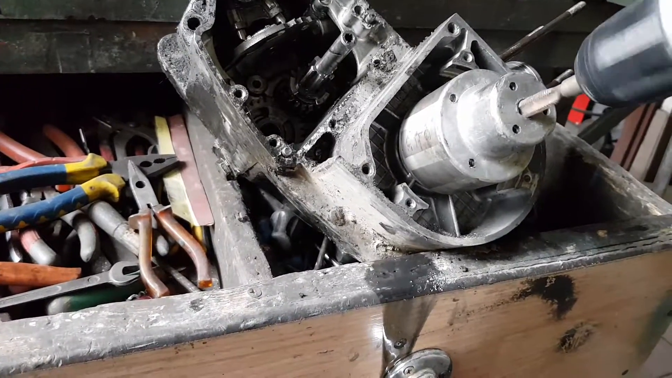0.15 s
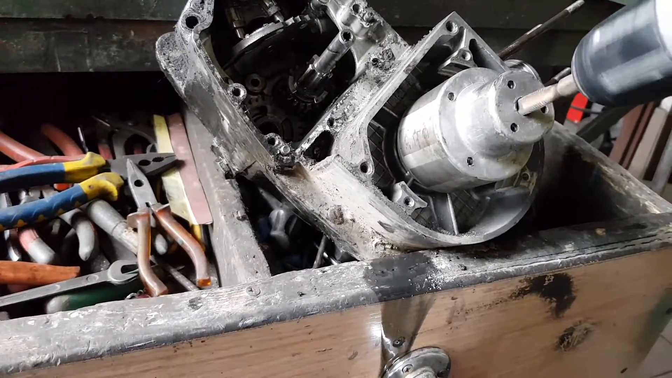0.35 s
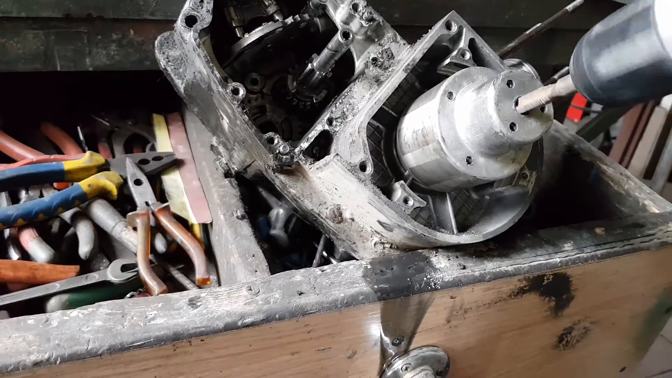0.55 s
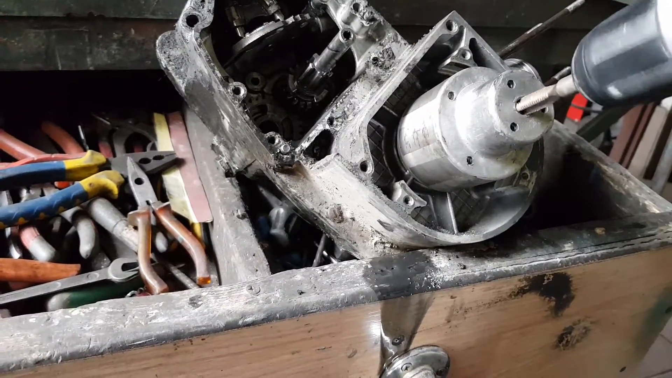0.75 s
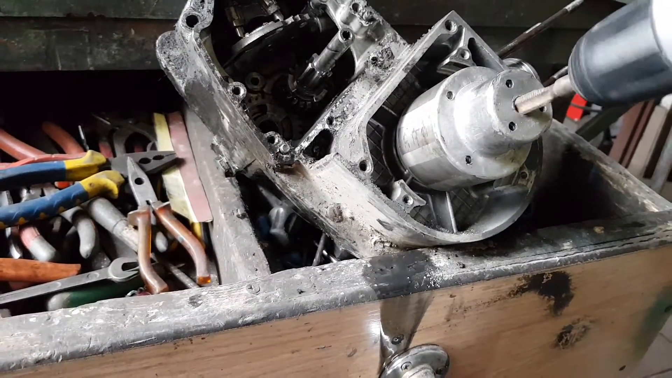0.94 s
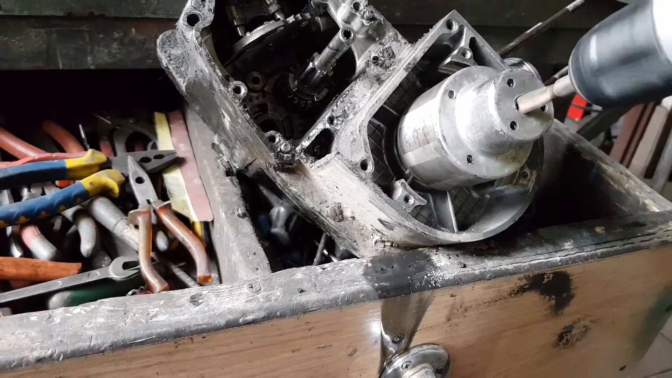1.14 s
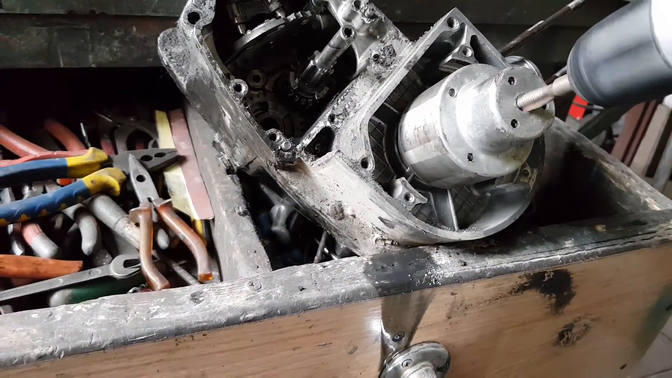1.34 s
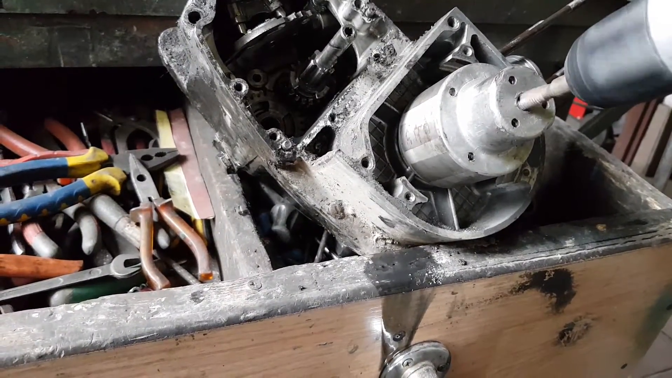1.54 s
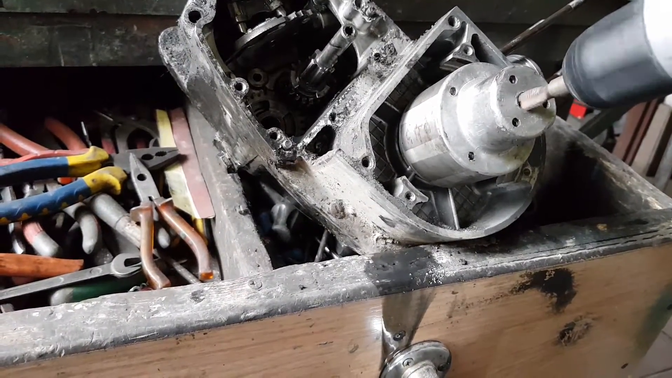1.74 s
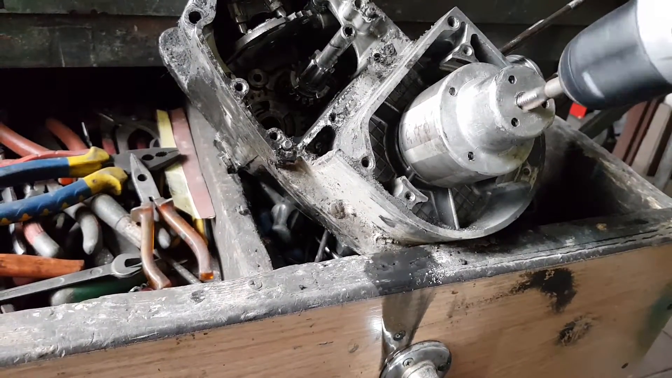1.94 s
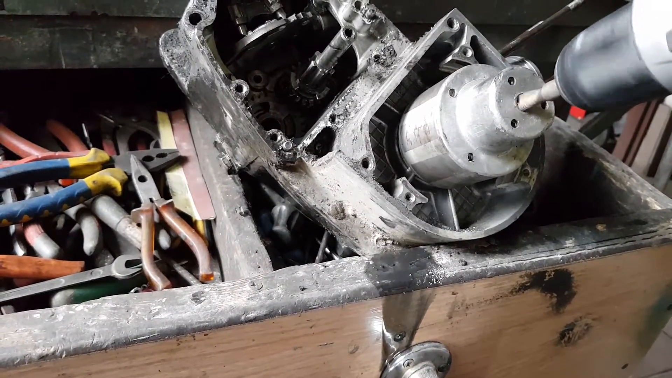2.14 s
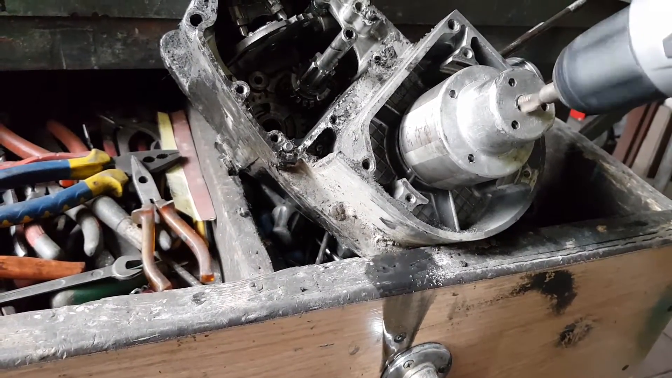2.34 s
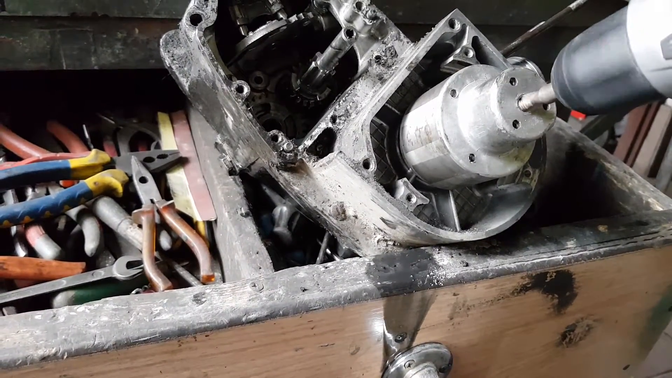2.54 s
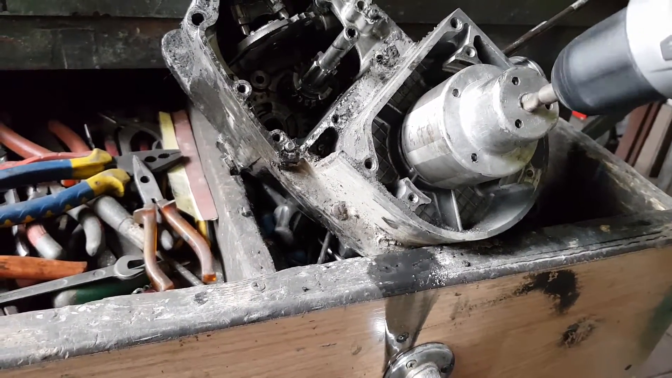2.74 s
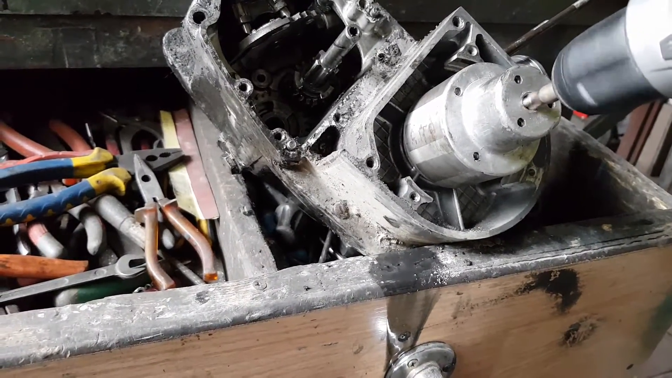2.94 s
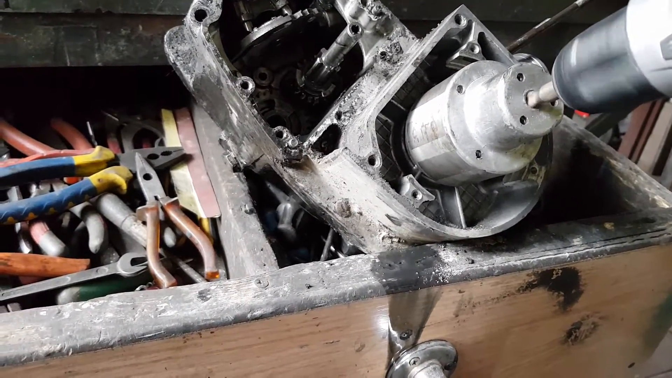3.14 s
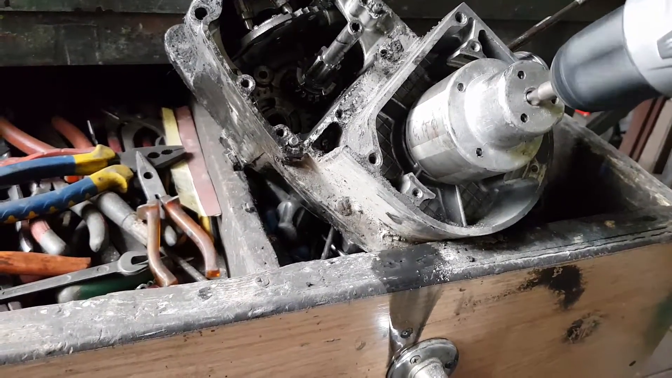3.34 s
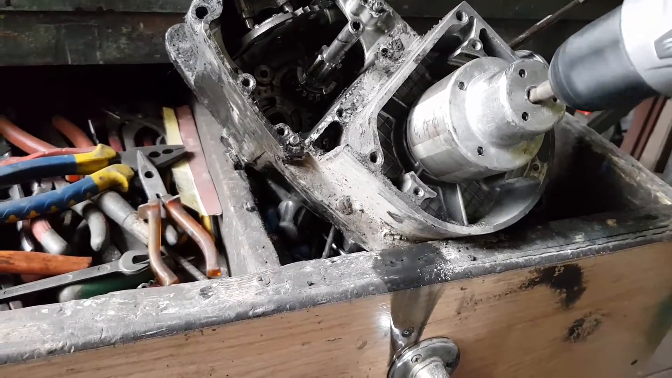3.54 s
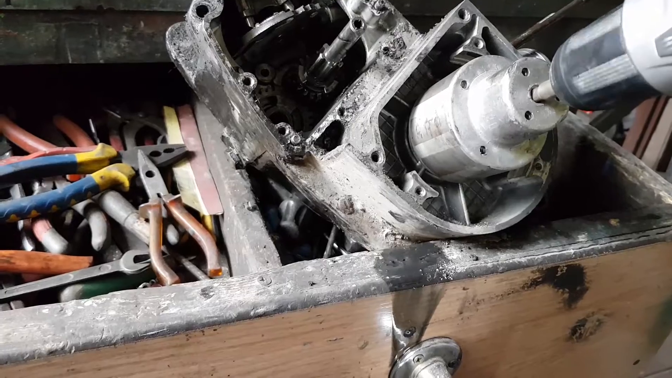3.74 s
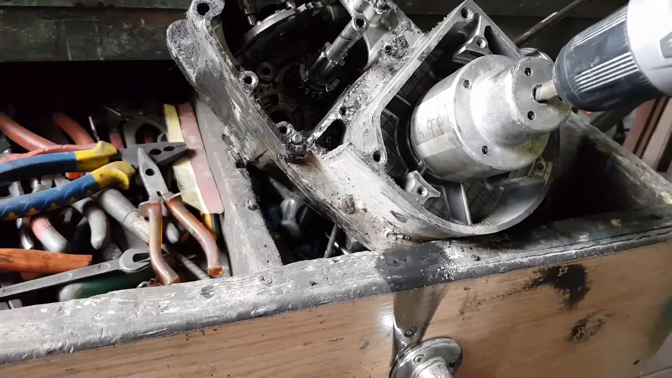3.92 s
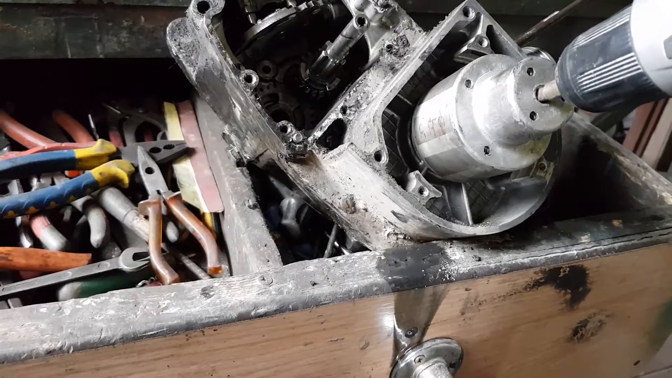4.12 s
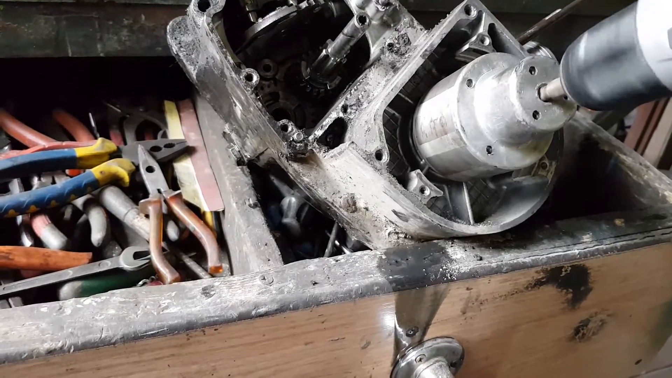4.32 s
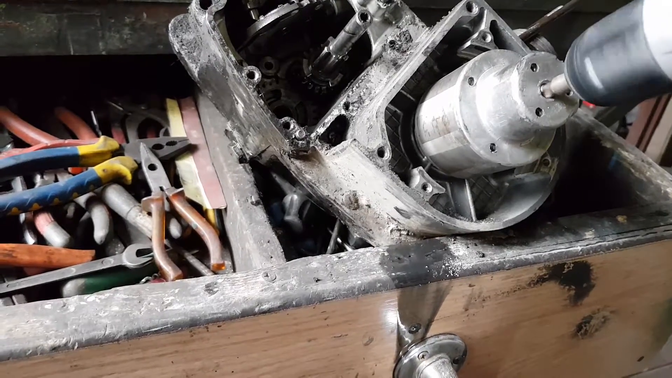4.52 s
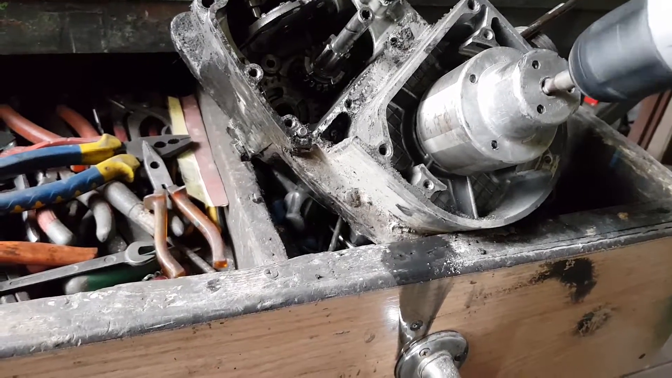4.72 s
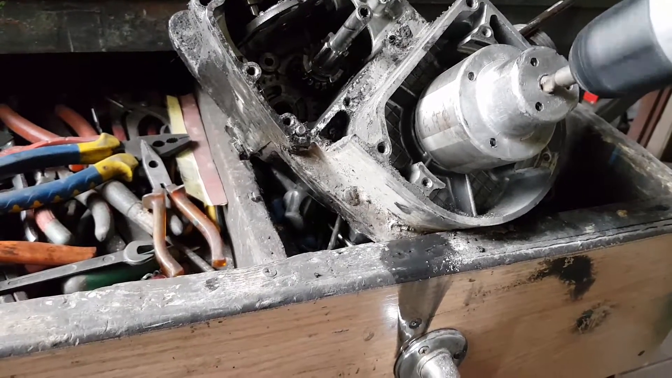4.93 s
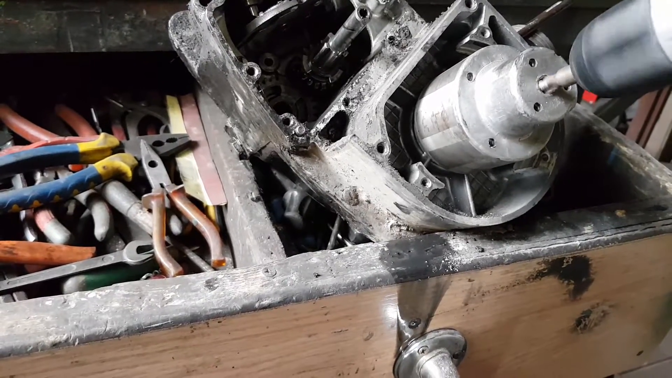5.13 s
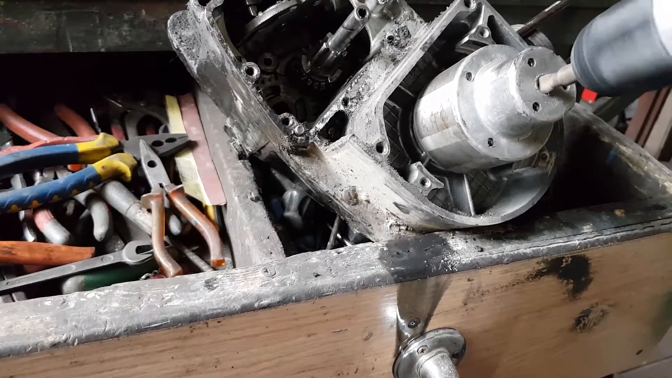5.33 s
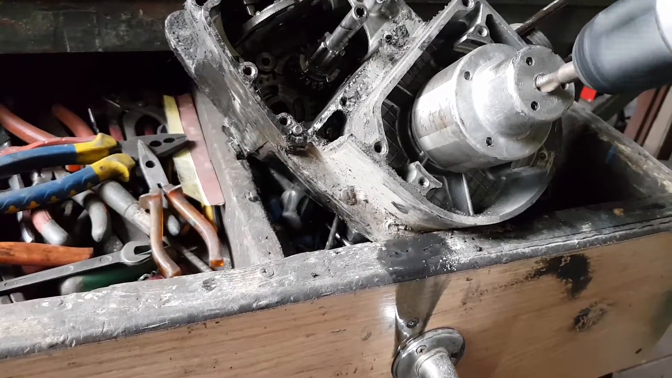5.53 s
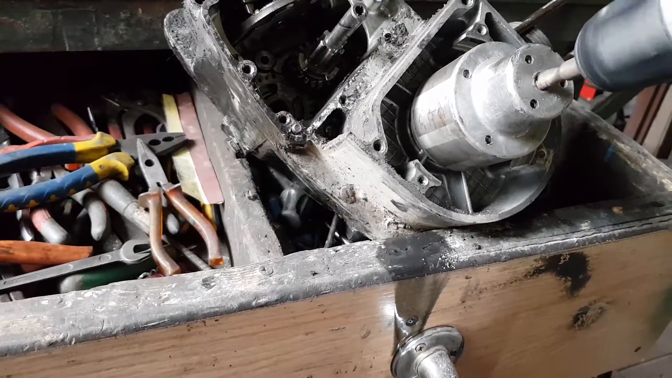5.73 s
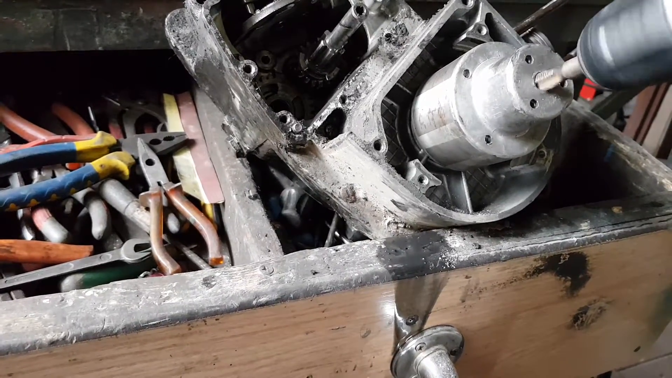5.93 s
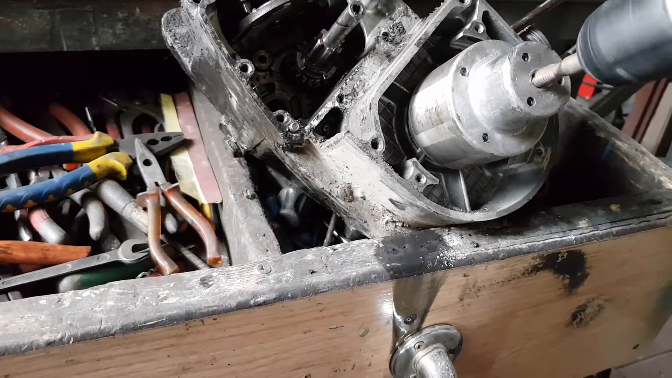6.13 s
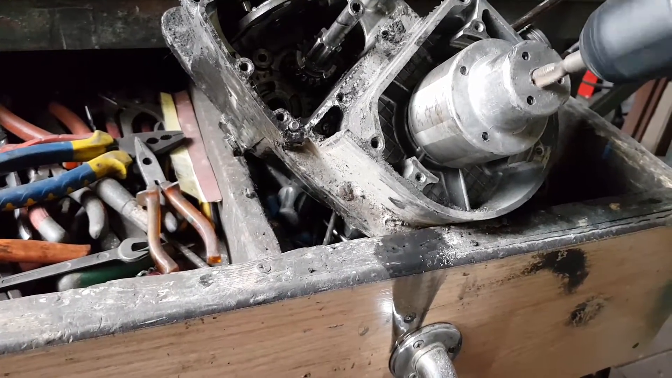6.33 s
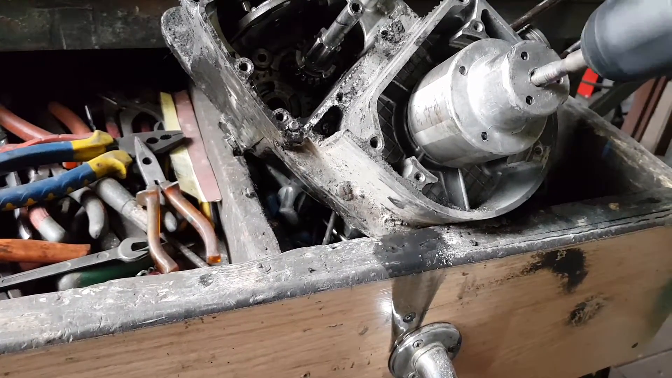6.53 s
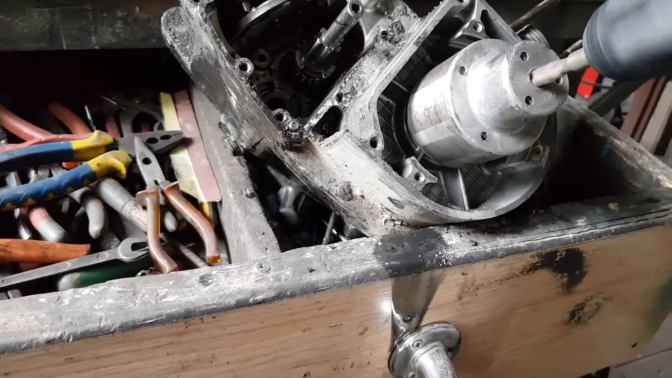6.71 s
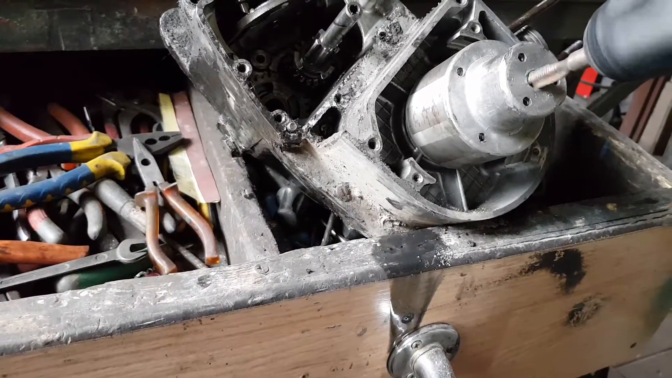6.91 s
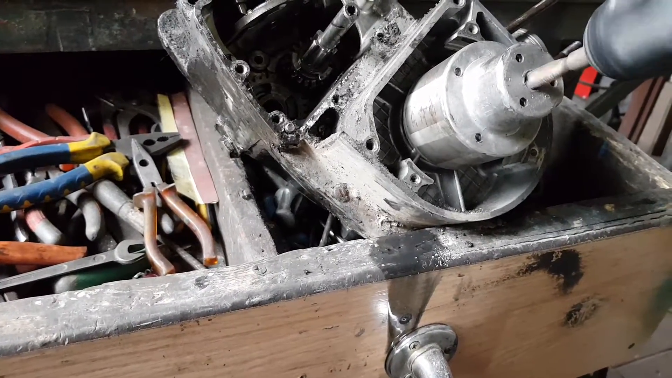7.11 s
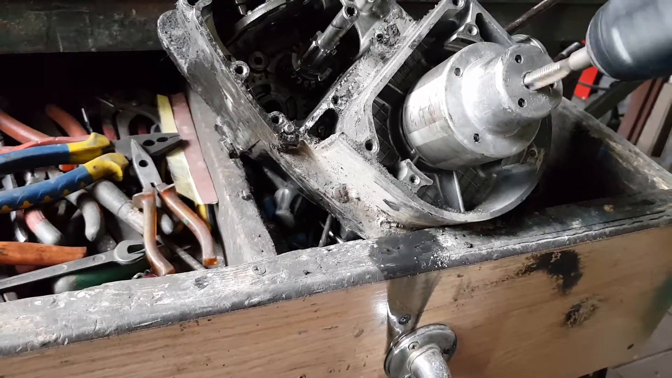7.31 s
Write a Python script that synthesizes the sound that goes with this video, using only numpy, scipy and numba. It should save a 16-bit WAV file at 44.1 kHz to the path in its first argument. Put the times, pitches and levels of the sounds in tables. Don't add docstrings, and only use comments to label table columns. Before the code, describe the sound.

A cordless drill crawls with a rough gear rattle, surges to a full whine, stops, clicks into reverse and whirs evenly onward.

```python
import sys
import numpy as np
from scipy import signal
from scipy.fft import rfft, irfft, next_fast_len
from scipy.io import wavfile
from scipy.ndimage import uniform_filter1d
from numba import njit

SR = 44100
rng = np.random.default_rng(int(sys.argv[2]) if len(sys.argv) > 2 else 0)


def gain_from_db(level_db):
    decades = np.asarray(level_db, float) / 20
    return 10 ** decades


def transcribe(u):
    v = np.clip(np.atleast_2d(u).T, -1, 1)
    q = np.round(v * 32767).astype(np.int16)
    wavfile.write(sys.argv[1], SR, q)


N = 329206
TIME = np.arange(N) / SR
SIZE = next_fast_len(N)
FREQ = np.maximum(np.arange(SIZE // 2 + 1) * SR / SIZE, 1)
FORWARD = TIME < 4
FAR_LAG_SAMPLES = 16.5


def level(x, db):
    return x * gain_from_db(db) / np.sqrt(np.mean(x ** 2))


def over_freq(points):
    hz, value = np.transpose(points)
    return np.interp(np.log(FREQ), np.log(hz), value)


def colour(x, gain):
    return irfft(rfft(x, SIZE) * gain, SIZE)[:N]


def band(lo_hz, hi_hz, order=2):
    low_skirt = 1 + (lo_hz / FREQ) ** (2 * order)
    high_skirt = 1 + (FREQ / hi_hz) ** (2 * order)
    return 1 / np.sqrt(low_skirt * high_skirt)


def bells(rings):
    return sum(db / (1 + (2 * (FREQ - hz) / width_hz) ** 2) for hz, width_hz, db in rings)


def walk(rate, size=N):
    step = 16
    k = int(SR / step / rate)
    held = np.repeat(rng.standard_normal(N // step // k + 2), k)
    slewed = uniform_filter1d(uniform_filter1d(held, k), k)
    return np.interp(np.arange(size) / step, np.arange(len(held)), 1.22 * slewed)


def bumps(rows, width_s):
    t = TIME[::32]
    return np.interp(TIME, t, sum(size * np.exp(-((t - s) / width_s) ** 2) for s, size in rows))


def settle(s, lag_s):
    return 1 - np.exp(-np.maximum(TIME - s, 0) / lag_s)


def order(turns, k, db, waver_db, rate):
    gain = gain_from_db(db + waver_db * walk(rate, size=len(turns)))
    return np.sqrt(2) * gain * np.sin(2 * np.pi * (k * turns + rng.random()))


@njit
def dull(x, hz):
    y, b, l = np.empty(len(x)), 0., 0.
    for i in range(len(x)):
        g = np.tan(np.pi * hz[i] / SR)
        v = (b + g * (x[i] - l)) / (1 + g * (g + 1.3))
        y[i] = l + g * v
        b, l = 2 * v - b, 2 * y[i] - l
    return y


def shop(source):
    # (frequency [Hz], density [dB per Hz])
    room_noise = [(18, -40.5), (30, 4), (95, 5), (124, -5.5), (259, -2), (295, -6), (449, -2.5), (866, -10),
                  (1250, 6), (2010, -8.5), (3310, -9), (7470, -19.5), (16000, -22)]
    noise_db, t60_s, wet_db = -64, 0.3, -13.5
    t = np.arange(SR // 2) / SR
    out = []
    for _ in range(2):
        decay = rng.standard_normal(len(t)) * 1000 ** (-t / t60_s) * (t > .004)
        tail = level(decay, wet_db) / np.sqrt(len(t))
        wet = colour(source, rfft(tail, SIZE) * band(60, 7300, order=1))
        hum = colour(rng.standard_normal(N) * gain_from_db(1.5 * walk(33)), gain_from_db(over_freq(room_noise)))
        out.append(wet + level(hum, noise_db + 2.5))
    return np.array(out)


def mains():
    # (time [s], rise [dB])
    swells = [
        (.5, 17),
        (5.3, 9),
        (7.3, 17),
    ]
    return gain_from_db(-67.5 + bumps(swells, .12)) * np.sin(2 * np.pi * 100.5 * TIME)


def draught(fan_hz):
    # (time [s], level [dB])
    air_levels = [
        (0, -33),
        (.5, -31),
        (.72, -37),
        (.92, -22),
        (1.13, -19.5),
        (1.18, -11.5),
        (2.35, -19.5),
        (2.7, -30.5),
        (3.75, -38),
    ]
    # (time [s], rise over the draught [dB])
    gust_rises = [(.16, 12), (.33, 7), (.47, 9), (.78, 4), (.95, 4), (1.07, 8), (2.02, 4.5), (2.2, 3.5),
                  (2.53, 3.5), (2.59, 4.5), (2.65, 1), (2.75, 3), (3.04, 7), (3.2, 6), (3.3, 9), (3.44, 9),
                  (3.66, 11.5)]
    # (time [s], level [dB], frequency [Hz])
    thumps = [(0.779, -20, 119), (.95, -14, 200), (2.132, -8, 332), (2.525, -11, 300), (2.647, -14, 139),
              (2.99, -15.5, 220), (3.68, -23, 150), (2.245, -4, 250), (2.836, -9.5, 250), (3.027, -11, 242),
              (3.05, -12, 167), (3.073, -8, 312), (3.198, -12.5, 146), (3.791, -21.5, 170),
              (4.289, -21, 280)]
    eddies_per_s, full_fan_hz = 450, 260
    edge_at_ref_hz, edge_floor_hz, edge_per_db = 375, 167, 0.74
    gust_db = np.interp(TIME, *np.transpose(air_levels), right=-90) + bumps(gust_rises, 0.022)
    edge_hz = np.maximum(edge_at_ref_hz * gain_from_db(edge_per_db * (gust_db + 12.5)), edge_floor_hz)
    edge_hz = np.minimum(edge_hz, 1.2 * fan_hz)
    fan_share = np.minimum(fan_hz / full_fan_hz, 1)
    wander = walk(90) * fan_share
    edge_hz = np.clip(edge_hz * 1.095 * gain_from_db(1.5 * wander), 40, 2000)
    hits = (rng.random(N) < eddies_per_s / SR) * rng.standard_normal(N)
    knocks = hits * np.sqrt(SR / eddies_per_s) * fan_share
    eddies = colour(knocks + 0.56 * rng.standard_normal(N), band(69, 4000, order=3))
    soft = dull(dull(dull(eddies, edge_hz), 1.75 * edge_hz), 2.66 * edge_hz)
    air = level(soft / np.sqrt(edge_hz), 0)
    air *= gain_from_db(gust_db + 0.88 * wander + .7 * walk(30))
    t = np.arange(-1000, 1000) / SR
    for at_s, db, hz in thumps:
        pulse = np.sin(2 * np.pi * hz * t) * np.exp(-(t * hz / 0.53) ** 2)
        air[int(at_s * SR) - 1000:][:len(t)] += gain_from_db(db) * pulse
    return air


def wobble(turns, slack, grip):
    fade_db = 75 * slack
    planet_db = -66.5 + 23 * grip - fade_db
    shaft_db = np.where(FORWARD, -57.5 + 9.5 * grip, -46.5 - 4.0 + 5 * (1 - grip)) - fade_db
    planet = order(turns, 2 / 3, planet_db, 2.5, rate=25)
    shaft = order(turns, 0.98, shaft_db, 1.1, rate=32) + order(turns, 2, shaft_db - 3.0, 2.8, rate=17)
    return np.array([planet + gain_from_db(np.where(FORWARD, -2.5, -11.)) * shaft, gain_from_db(-2.0) * planet + shaft])


def clicks():
    # (time [s], peak [dB], left minus right [dB])
    snaps = [
        (3.796, -27.5, 1.5),
        (3.8875, -41, -1),
        (3.9205, -49, -4),
        (4.0801, -44, -3),
        (4.156, -21, -10),
        (4.1583, -13, -18),
        (4.1600, -3, -3),
        (4.2334, -25, -5),
        (4.2766, -10, -12),
        (4.2846, -10, -13),
    ]
    # (frequency [Hz], level [dB], t60 [s])
    grip_modes = [(1170, -24, 0.021), (2324, 1.5, 0.012), (2870, 8, 0.0061), (4060, 20, 0.0091),
                  (4540, 6, 0.0089), (6000, -14, .006), (7500, 3, 0.011), (11000, -6.5, .004),
                  (13300, -7, .004)]
    mode_spread = .015
    out, t = np.zeros((2, N)), np.arange(1500) / SR
    for s, db, pan_db in snaps:
        for side, gain_db in enumerate((pan_db / 2, -pan_db / 2)):
            ring = np.zeros(len(t))
            for hz, mode_db, t60_s in grip_modes:
                mode_hz = hz * (1 + mode_spread * rng.standard_normal())
                ring += gain_from_db(mode_db) * np.sin(2 * np.pi * mode_hz * t) * 1000 ** (-t / t60_s)
            decay = 0.48 * np.exp(-t / 0.0002) + 0.044 * np.exp(-t / 0.0023)
            crack = np.diff(rng.standard_normal(len(t) + 1)) * decay
            at = int(s * SR + (1 - side) * FAR_LAG_SAMPLES)
            out[side, at:at + len(t)] += gain_from_db(db + gain_db + 2.5) * (ring / np.abs(ring).max() + crack)
    return signal.sosfilt(signal.butter(2, 550, "high", fs=SR, output="sos"), out)


def squeals():
    # (start [s], length [s], start frequency [Hz], end frequency [Hz], level [dB])
    bindings = [(.465, .025, 3480, 3500, -33), (.625, .035, 3480, 3480, -33), (.926, .04, 3450, 3570, -24),
                (2.469, .0085, 11050, 10950, -4), (2.4785, .0135, 10800, 11050, -2),
                (2.492, .042, 11000, 11000, -18), (2.641, .004, 10700, 10200, -6),
                (2.6456, .013, 10450, 11200, -2), (2.6595, .012, 10800, 10800, -14),
                (2.68, .018, 10700, 10800, -18), (5.494, .006, 10550, 10500, -9),
                (5.501, .012, 10550, 11250, -5), (5.516, .009, 10450, 10500, -13),
                (5.663, .014, 11900, 11860, -12), (5.835, .005, 9900, 9850, -4),
                (5.84, .006, 10500, 10500, -17), (5.841, .02, 9900, 9900, -23),
                (5.905, .006, 9000, 9900, -22)]
    gain_db, pan_db, lag_rad, ramp_s = 6, -3.5, 1.4, 0.0013
    out, rough = np.zeros((2, N)), gain_from_db(2.2 * walk(450))
    for start_s, length_s, from_hz, to_hz, db in bindings:
        t = np.arange(int(length_s * SR)) / SR
        ramps = np.minimum(1, np.minimum(t, length_s - t) / ramp_s)
        shape = (0.46 + 0.26 * t / length_s) * ramps
        phase = 2 * np.pi * (from_hz * t + (to_hz - from_hz) * t ** 2 / (2 * length_s))
        tone = np.array([gain_from_db(pan_db) * np.sin(phase - lag_rad), np.sin(phase)])
        at = int(start_s * SR)
        out[:, at:at + len(t)] += gain_from_db(db + gain_db) * shape * tone * rough[at:at + len(t)]
    return out


def chopper(turns):
    chop_hz, chop_db, off_s = 6460, -47, 1.15
    sides = 1 + 1.6 * np.cos(2 * np.pi * 6 * turns)
    tone = sum(np.sin(2 * np.pi * k * chop_hz * TIME) for k in (1, 2))
    return gain_from_db(chop_db + 2.5 * walk(17)) * sides * tone * (TIME < off_s)


def whine(turns, bars_db, mesh_db):
    forward_orders = [18, 20, 23, 24, 31, 32, 35, 36, 37, 39, 42, 44, 45, 46, 49]
    forward_db = [-17, -5, -12, -12.5, -14, -13.5, -9.5, -3.5, -10, -0.5, -14.5, -3.5, -16, -4.5, -17.5]
    reverse_orders = [21, 24, 28, 30, 32, 33, 34, 43, 45, 46, 48, 50, 51]
    reverse_db = [-8, -6, -11, -12, -14, -11, -4, -2, -1, -12, -13, -3, -12]
    out = order(turns, 12, bars_db, .6, rate=40)
    shaken = turns + np.cumsum(walk(45)) * .45 / SR
    stop = 4 * SR
    ways = ((forward_orders, forward_db, slice(0, stop)), (reverse_orders, reverse_db, slice(stop, N)))
    for orders, dbs, span in ways:
        for k, db in zip(orders, dbs):
            out[span] += order(shaken[span], k, mesh_db[span] + db - 4, 2.5, rate=35)
    return out


def loaded_gears(turns, slack, grip):
    pinion = order(turns, 10.08, -55 + 24 * grip - 60. * slack, 3.2, rate=26)
    mesh = order(turns, 35, -60 + 26 * grip - 100 * slack, 2, rate=30)
    return (TIME > 4) * pinion + mesh


def tones(turns, hz, share, bars_db, grip):
    slack = 1 - share
    coast_db = np.where(FORWARD, 110, 15.) * slack * (TIME > 2)
    blur_db = .004 * np.abs(np.gradient(hz) * SR) * (TIME < 2)
    bars_db = bars_db - coast_db - 60 * (share < .2) - blur_db
    mesh_db = np.where(FORWARD, bars_db + 1 - 6 * grip, -28) - 65. * slack
    return whine(turns, bars_db, mesh_db) + chopper(turns) + loaded_gears(turns, slack, grip)


def speed(full_hz):
    # (time [s], spin-up lag [s])
    squeezes = [
        (.835, .1),
        (1.14, .038),
    ]
    crawl_share, creep_per_s, pull_share = .27, .075, .235
    release_s, coast_hz_per_s2 = 3.6, 2600
    restart_s, restart_lag_s = 4.247, .028
    (first_s, first_lag_s), (second_s, second_lag_s) = squeezes
    share = crawl_share + creep_per_s * np.minimum(TIME, second_s)
    share = share + pull_share * settle(first_s, first_lag_s)
    share = share + (1 - share) * settle(second_s, second_lag_s)
    share = share - coast_hz_per_s2 * np.maximum(TIME - release_s, 0) ** 2 / full_hz
    return np.maximum(np.where(FORWARD, share, settle(restart_s, restart_lag_s)), .02)


def rattle_levels(run_db, share, grip):
    # (time [s], rise [dB])
    surges = [
        (.15, 0.5),
        (.3, 2.5),
        (.45, 0),
        (.945, 2.5),
        (1.05, 2.5),
        (1.155, 3.5),
        (1.25, 2.5),
        (.62, 0.5),
        (1.64, -1),
    ]
    brake_s, brake_db_per_s = 3.735, 429
    lever_s, shake_db, shake_db_per_s = 4.162, -24.5, 650
    creep_s, creep_db, creep_lag_s = 4.215, -37.5, 0.0062
    engage_s, engage_lag_s = 4.247, 0.018
    crawl_low_db, full_low_db = -12, -9
    forward = gain_from_db(run_db + bumps(surges, 0.026) - brake_db_per_s * np.maximum(TIME - brake_s, 0))
    shake = gain_from_db(shake_db - shake_db_per_s * np.abs(TIME - lever_s)) * (TIME > lever_s)
    creep = gain_from_db(creep_db) * settle(creep_s, creep_lag_s)
    reverse = shake + creep + gain_from_db(run_db) * settle(engage_s, engage_lag_s)
    gear_db = 20 * np.log10(np.where(FORWARD, forward, reverse) + 1e-6)
    hush_db = np.clip(run_db - gear_db, 0, 32)
    low_db = crawl_low_db + (full_low_db - crawl_low_db) * share ** 1.8 - grip + 0.48 * hush_db
    top_db = np.where(FORWARD, -2, -0.5) - 0.35 * hush_db
    return gear_db, low_db, top_db


def gears(turns, hz, gear_db, low_db, top_db):
    # (frequency [Hz], density [dB per Hz])
    housing = [(50, -34), (150, -16.5), (400, -14.5), (900, -12.5), (1500, -8.5), (2200, -6), (3200, -0.5),
               (5000, -3.5), (7500, -2.5), (9500, -8), (12000, -1.5), (14000, -9), (15800, -5.5)]
    # (frequency [Hz], width [Hz], level over housing [dB])
    full_rings = [(983, 450, 6), (1595, 204, 6), (2980, 220, 1.5), (4255, 550, 4.5), (5600, 234, 6.5),
                  (6280, 1170, 3.5), (7150, 170, 0.5), (8660, 200, 4.5), (10000, 420, -3.5),
                  (10900, 780, 2), (13000, 800, 5.5), (13830, 500, 0)]
    # (frequency [Hz], width [Hz], level [dB])
    slow_rings = [(605, 660, -2), (2000, 590, -6), (2450, 110, 5.5), (3070, 400, 2), (4030, 170, 6)]
    throb = gain_from_db(0.74 * np.cos(2 * np.pi * turns) + .65 * walk(12) + 0.77 * walk(90))
    body, crawl = gain_from_db(over_freq(housing) + bells(full_rings)), gain_from_db(bells(slow_rings))
    body /= np.sqrt(np.mean(body ** 2))
    parts = [(band(20, 2273, order=8), low_db + 12.0),
             (band(2750, 10050, order=8), 0),
             (band(10540, 17000, order=8), top_db + 4.0)]
    slow = np.clip((150 - hz) / 40, 0, 1) * FORWARD
    out = []
    for _ in range(2):
        impacts = rng.standard_normal(N) * throb * gain_from_db(1.77 * rng.exponential(size=N))
        teeth = rfft(level(impacts, 1.83), SIZE)
        rattle = np.zeros(N)
        for part, db in parts:
            rattle += irfft(teeth * body * part, SIZE)[:N] * gain_from_db(gear_db + db + 0.34 * walk(7.9))
        out.append((1 - slow) * rattle + colour(slow * rattle, crawl))
    return out


def far_port(x, stranger):
    # (frequency [Hz], level re near port [dB])
    shadow_points = [(60, -9), (200, -4.5), (400, -5), (700, -8.5), (1300, -5), (2200, -7.5), (3500, -7),
                     (5600, -8.5), (8000, -11.5), (9000, -9.5), (11500, -14), (13000, -23), (16000, -31)]
    # (frequency [Hz], share [0-1])
    likeness = [(60, 0.74), (400, 0.44), (1200, 0.7), (2200, 0.28), (5000, 0.11), (11500, 0.32),
                (16000, 0.37)]
    bench_lag_samples = 55
    direct = np.exp(-2j * np.pi * FREQ * FAR_LAG_SAMPLES / SR)
    paths = direct + 0.2 * np.exp(-2j * np.pi * FREQ * bench_lag_samples / SR)
    share = np.clip(over_freq(likeness), 0, 1)
    shadow = gain_from_db(over_freq(shadow_points))
    return colour(x, shadow * share * paths * 1.2) + colour(stranger, shadow * np.sqrt(1 - share ** 2))


def scene():
    # (time [s], shaft at full trigger [Hz], rattle [dB], commutator [dB], tap grip [0-1])
    motor = np.array([(0, 320.2, -24, -63, 0), (.8, 319.9, -22.5, -46, 0), (.87, 320, -20, -36, 0.8),
                      (1.14, 320, -16.5, -30, 0.4), (1.3, 321.1, -16.5, -25, 0),
                      (1.85, 320, -19, -29, 0.02), (2.43, 311.7, -19, -32, 1), (2.75, 312, -23, -37, 0.37),
                      (3.7, 309.3, -23, -40, 1), (4.3, 296.7, -17.5, -27, 0.82),
                      (5.0, 296.1, -17, -29.5, 0.88), (5.35, 300.1, -16.5, -26, 0.76),
                      (5.65, 298, -19, -27, 0.78), (5.86, 303.3, -22.5, -28, 0.55),
                      (5.94, 304.1, -22, -26, 0.4), (6.8, 303.7, -21.5, -25.5, 0.37),
                      (7.0, 304, -20, -24, 0), (7.46, 305.8, -18.5, -21.5, 0)])
    # (time [s], drop [Hz])
    snags = [
        (4.45, 2.04),
        (4.76, 1.),
        (5.08, 3.96),
        (5.21, 1.96),
        (5.6, 2.),
    ]
    full_hz, run_db, bars_db, grip = (np.interp(TIME, motor[:, 0], c) for c in motor.T[1:])
    share = speed(full_hz)
    hz = share * full_hz - bumps(snags, .035)
    turns = np.cumsum(hz) / SR
    near, faces = gears(turns, hz, *rattle_levels(run_db, share, grip))
    sung = tones(turns, hz, share, bars_db, grip)
    drill = np.array([far_port(near + 0.21 * sung, faces), near + sung])
    close = drill + squeals() + clicks()
    out = close + shop(close[1] - 0.68 * sung) + wobble(turns, 1 - share, grip) + mains()
    out[1] += draught(hz)
    return out


def top_cut(x):
    return signal.sosfilt(signal.butter(12, 16840, fs=SR, output="sos"), x)


def record(dry):
    cut = signal.ellip(14, .5, 90, 15720, fs=SR, output="sos")
    mix = signal.sosfilt(cut, np.tanh(1.034 * dry))
    return top_cut(mix)


dry = scene()
out = record(dry)
transcribe(out)
```